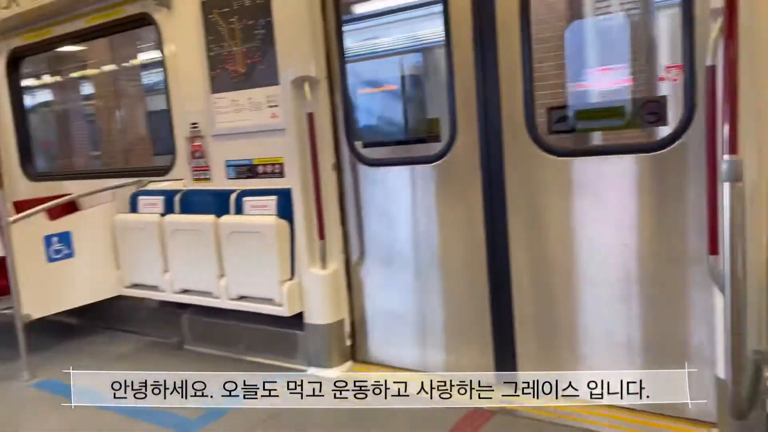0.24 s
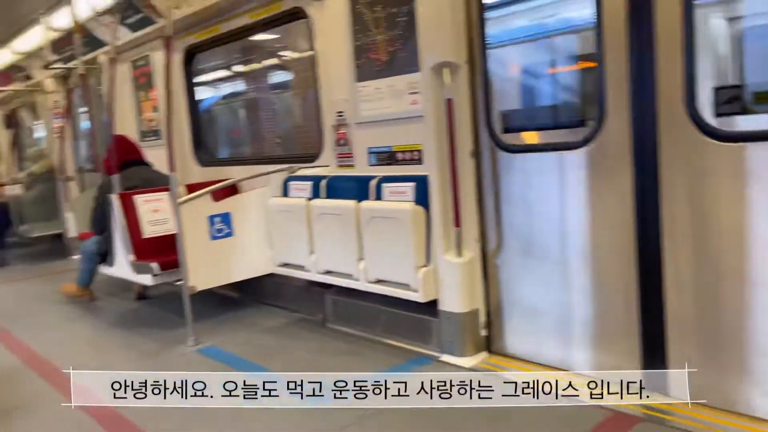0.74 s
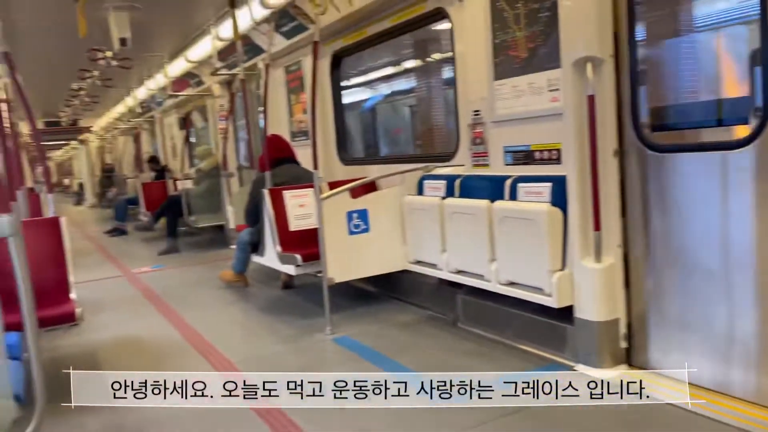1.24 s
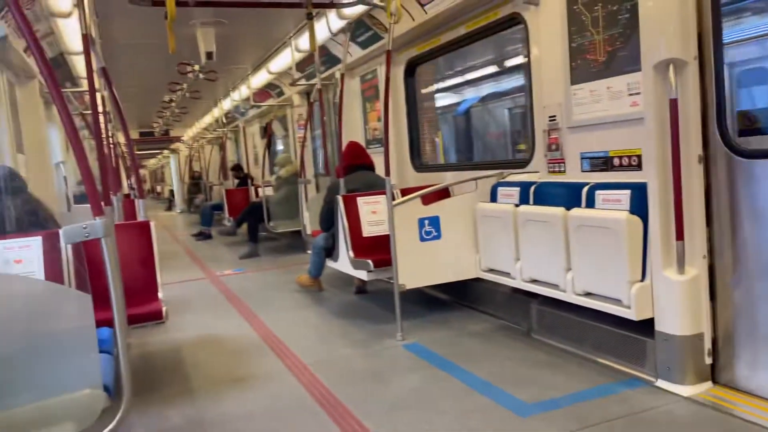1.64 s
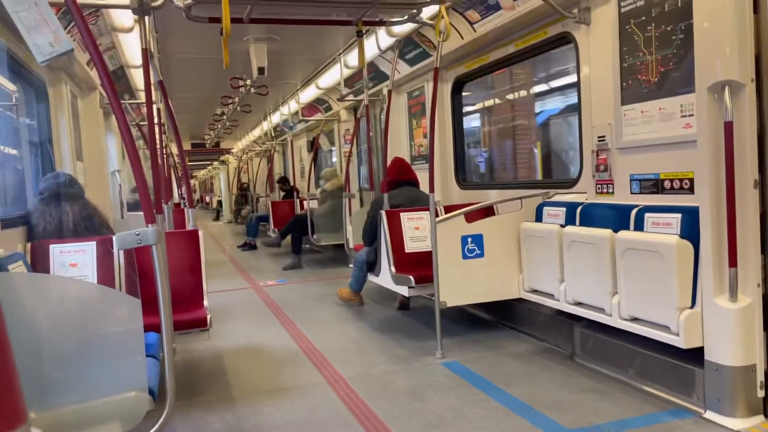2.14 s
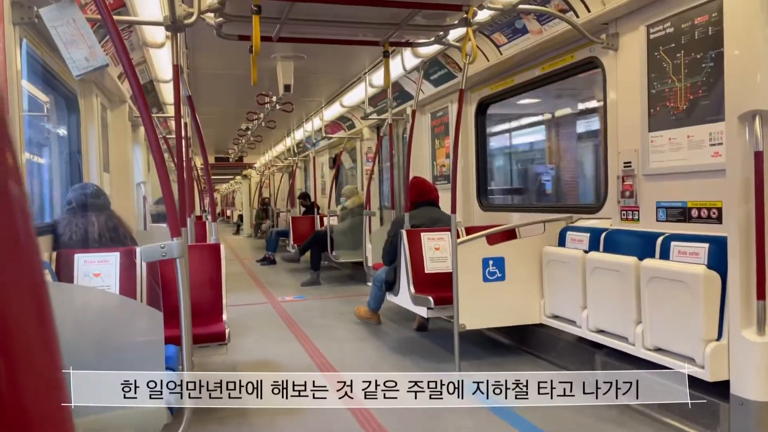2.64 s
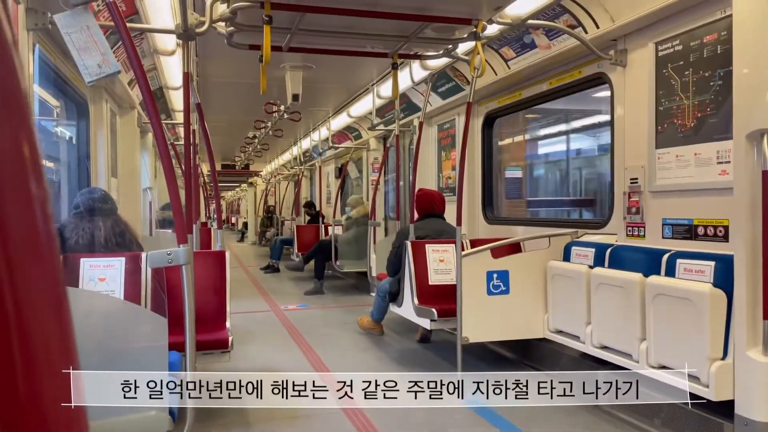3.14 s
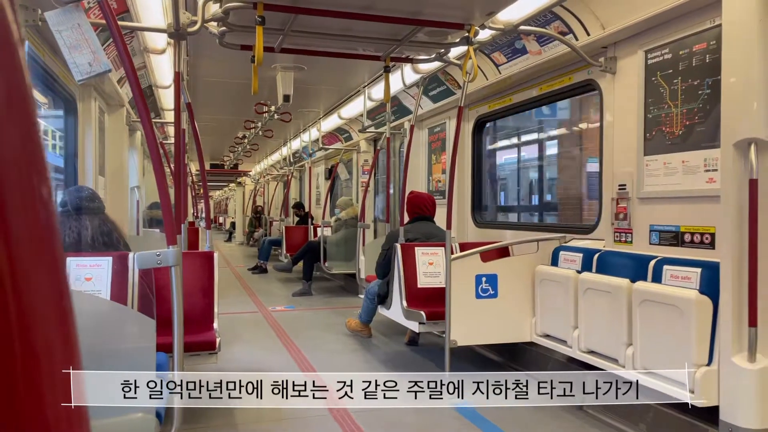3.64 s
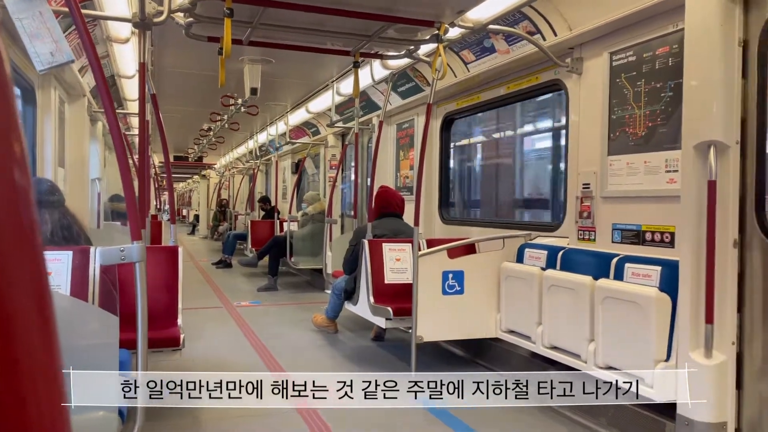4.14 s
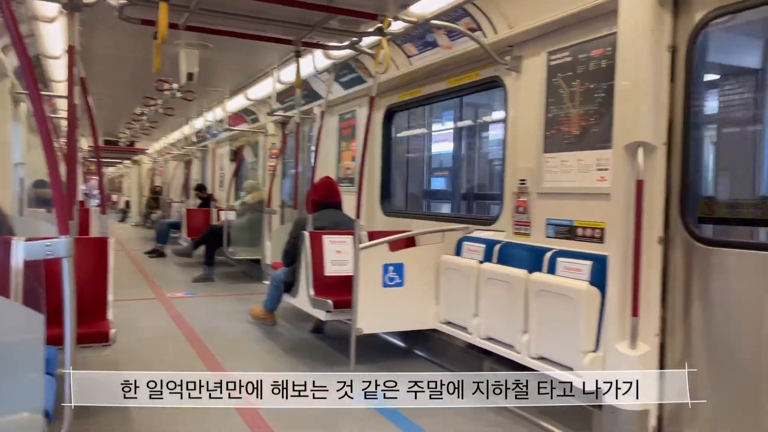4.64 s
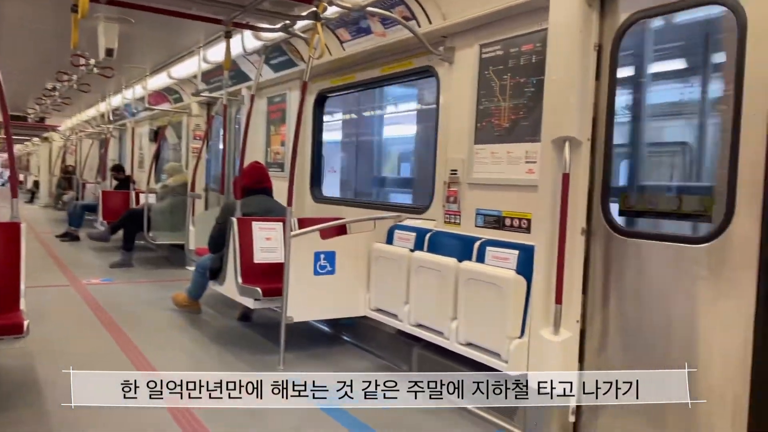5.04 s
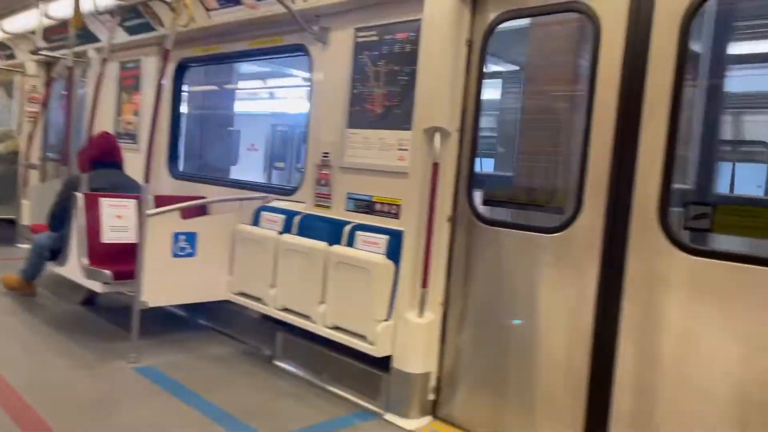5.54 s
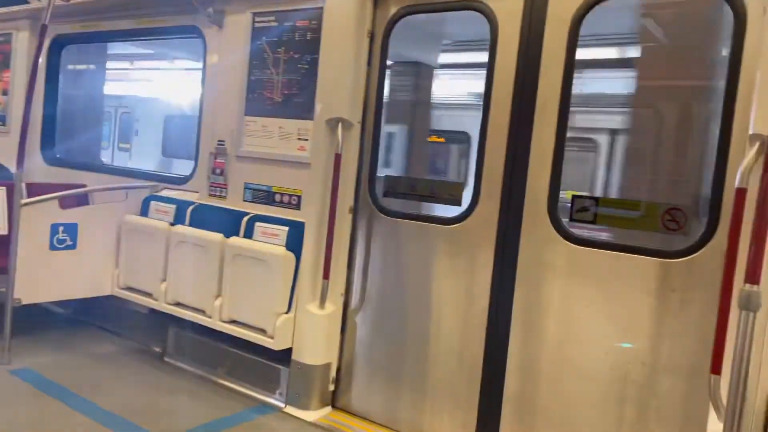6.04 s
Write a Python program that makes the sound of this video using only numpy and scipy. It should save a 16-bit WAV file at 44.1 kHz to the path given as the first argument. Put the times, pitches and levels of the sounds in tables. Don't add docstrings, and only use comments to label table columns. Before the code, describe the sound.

Inside a subway carriage under way, close stereo microphones catch a continuous low wheel rumble and dull floor booms. A thin, beady motor whine grows clearer through the middle, over soft vent hiss and humming rails. Joint thumps become frequent in the second half, jolts get heavier, the whine fades, and a faint brake note enters at the end.

```python
import sys
import numpy as np
from scipy import signal
from scipy.fft import rfft, irfft
from scipy.io import wavfile
from scipy.ndimage import uniform_filter1d

SR = 44100
rng = np.random.default_rng(int(sys.argv[2]) if len(sys.argv) > 2 else 0)


def voltage_ratio(level):
    return 10 ** (np.asarray(level, float) / 20)


def output_pcm(signal):
    pcm = np.clip(np.atleast_2d(signal).T, -1, 1) * 32767
    wavfile.write(sys.argv[1], SR, np.round(pcm).astype(np.int16))


N = 277830


def rms_one(x):
    return x / np.sqrt(np.mean(x ** 2) + 1e-20)


def in_time(rows):
    s, *columns = np.transpose(rows)
    return [np.interp(np.arange(N) / SR, s, column) for column in columns]


def at_hz(points, hz):
    point_hz, value = np.array(points)[:, 0], np.array(points)[:, 1]
    return np.interp(np.log(hz + 1), np.log(point_hz + 1), value)


def drift(rate):
    coarse = 40
    r = np.exp(-2 * np.pi * coarse * rate / SR)
    noise = rng.standard_normal(N // coarse + 2002)
    slow = signal.lfilter([1], [1, -2 * r, r * r], noise)[2000:]
    return np.interp(np.arange(N) / coarse, np.arange(len(slow)), rms_one(slow))


def tone(hz, wobble, rate):
    return np.sqrt(2) * np.sin(2 * np.pi * np.cumsum(hz) / SR + wobble * drift(rate))


RISE_SHARE = .7


def surges(steady_db, s, db, half_s):
    t = np.arange(0, N + 100, 100) / SR
    since = t[:, None] - s
    width_s = half_s * np.where(since < 0, RISE_SHARE, 1)
    bells = voltage_ratio(2 * np.array(db)) * np.exp(-(since / width_s) ** 2)
    surge_power = np.interp(np.arange(N) / SR, t, bells.sum(axis=1))
    return 10 * np.log10(voltage_ratio(2 * steady_db) + surge_power)


# (pitch [Hz], likeness [0-1])
LIKENESS = [(40, 1), (150, 0.75), (300, 0.87), (600, 0.57), (1000, 0.37), (2000, 0.13), (2900, 0.33),
            (4200, 0.54), (5500, 0.26), (6200, 0.54), (7900, 0.74), (10000, 0.52), (11500, 0.46),
            (13300, .45), (14600, 0.79)]
# (pitch [Hz], phase lead [radians])
LEAD = [(20, 0), (600, -.35), (1700, -.35), (2100, -.7), (3100, .7), (4100, -.1), (5100, .9), (5800, -.4),
        (6200, -.4), (6700, -1.1), (7900, -3.1), (8700, -3.2), (10000, -4.9), (11000, -6.3), (12500, -6.4),
        (14000, -9.4)]


def ports(gain_at):
    hz = np.arange(N // 2 + 1) * SR / N
    shared, own = rfft(rng.standard_normal((2, N)))
    alike = np.clip(at_hz(LIKENESS, hz), 0, 1)
    lead = np.interp(hz, *np.transpose(LEAD))
    right = alike * shared * np.exp(-1j * lead) + np.sqrt(1 - alike ** 2) * own
    return rms_one(irfft(np.array([shared, right]) * gain_at(hz), N))


def rolling(spectrum, level_db, flutter_db, flutter_rate):
    level = voltage_ratio(level_db + flutter_db * drift(flutter_rate))
    return level * ports(lambda hz: voltage_ratio(at_hz(spectrum, hz)))


def ringing(centre_hz, width_hz):
    return ports(lambda hz: 1 / (1 + (2 * (hz - centre_hz) / width_hz) ** 2))


# (pitch [Hz], level [dB per Hz])
RUMBLE = [(18, -15), (25, -5), (32, -2.5), (45, 2), (55, -5.5), (70, 8), (95, -6.5), (125, -1),
          (170, -10.5), (300, -110)]


def rumble(panel):
    shaking_db = uniform_filter1d(panel[1], size=8000)
    return rolling(RUMBLE, shaking_db * 0.5 - 17.5, flutter_db=-0.5, flutter_rate=6.1)


# (pitch [Hz], level [dB per Hz])
ROAR = [(40, -77), (80, -3), (120, -1), (170, -3), (300, -5), (420, -9), (520, -23), (800, -30),
        (1500, -110)]
ROAR_DB, ROAR_GROWTH = -31.5, 0.045
JOINT_SURGE_S, JOINT_ROAR_DB = 0.12, -16


def roar():
    joint_s, joint_db = np.transpose(JOINTS)[:2]
    steady_db = ROAR_DB + ROAR_GROWTH * np.arange(N) / SR
    roar_db = surges(steady_db, joint_s, joint_db + JOINT_ROAR_DB, JOINT_SURGE_S)
    return rolling(ROAR, roar_db, flutter_db=0.0, flutter_rate=2.2)


# (pitch [Hz], level [dB per Hz])
RAILS = [(200, -49), (400, -3), (520, -1.5), (750, -1.5), (1000, -8), (1400, -13.5), (2200, -44),
         (4000, -100)]
RAILS_DB, RAILS_FOLLOW = -36.5, 0.99


def rails(drive_db):
    return rolling(RAILS, RAILS_DB + RAILS_FOLLOW * drive_db, flutter_db=.5, flutter_rate=3.5)


# (time [s], level [dB], half length [s])
BRUSHES = [
    (0.552, -54, .08),
    (1.0, -59, .06),
    (2.25, -49, 0.13),
    (2.685, -49, .1),
    (3.56, -48, 0.039),
    (4.144, -60, 0.22),
    (5.344, -47, 0.21),
]
HISS_DB, HISS_FOLLOW = -45, 0.59


def hiss_level(drive_db):
    return surges(HISS_DB + HISS_FOLLOW * drive_db, *np.transpose(BRUSHES))


# (pitch [Hz], level [dB per Hz])
HISS = [(600, -63), (1100, -14), (1500, 2.5), (2000, 2), (2900, -2.5), (3300, -8), (4700, -12), (5300, -16),
        (7000, -20), (8000, -24.5), (10000, -99)]


def hiss(hiss_db):
    return rolling(HISS, hiss_db, flutter_db=.5, flutter_rate=16)


# (pitch [Hz], width [Hz], level [dB])
WHEEL_RINGS = [(1950, 130, -59.5), (2730, 60, -64), (2876, 24, -64.5), (4870, 420, -79)]


def wheel_rings(hiss_db):
    rings = sum(voltage_ratio(db + 1.1 * drift(8.6)) * ringing(hz, width) for hz, width, db in WHEEL_RINGS)
    return rings * voltage_ratio(hiss_db + 45.5)


# (pitch [Hz], level [dB per Hz])
DRAUGHT = [(5000, -59), (6500, -2), (7600, -2), (8700, 5.5), (10000, -2), (10800, -3), (13000, -5.5),
           (15000, -7), (15800, -27)]
# (time [s], level [dB], half length [s])
GUSTS = [(.73, -60.5, .1), (1.08, -62, .03), (1.51, -67, .04), (2.29, -64.5, .06), (2.85, -68, .06),
         (3.2, -65, .04), (3.56, -66, .05), (3.76, -66, .04), (5.0, -59, .025), (5.06, -59.5, .035),
         (5.2, -59.5, .06), (5.32, -60, .11), (.02, -63, .05), (4.25, -66, .15), (4.62, -66, .06),
         (5.56, -63, .08), (.25, -64, .15), (6.0, -70, .4)]
DRAUGHT_DB, DRAUGHT_FOLLOW = -64.5, 1.9


def draught(drive_db):
    draught_db = surges(DRAUGHT_DB + DRAUGHT_FOLLOW * drive_db, *np.transpose(GUSTS))
    return rolling(DRAUGHT, draught_db, flutter_db=.6, flutter_rate=10)


# (time [s], level [dB], half length [s])
WHISTLE = [
    (.72, -69, 0.074),
    (1.72, -69, 0.049),
    (1.921, -70, .05),
    (2.293, -67, 0.085),
    (3.419, -68, 0.066),
    (3.702, -63, 0.11),
    (3.928, -62, 0.045),
    (5.303, -99, 0.091),
]
WHISTLE_DB, WHISTLE_FOLLOW = -75.5, 1.5


def whistle(drive_db):
    whistle_db = surges(WHISTLE_DB + WHISTLE_FOLLOW * drive_db, *np.transpose(WHISTLE))
    return voltage_ratio(whistle_db) * ringing(9400, width_hz=650)


PATCH_DB, PATCH_HZ, PATCH_S = 1.3, 90, .14


def patchy(x):
    padded = np.pad(x, ((0, 0), (0, 2048)), "reflect")
    hz, s, frames = signal.stft(padded, SR, nperseg=1024, boundary="even")
    field = rng.standard_normal(frames.shape[1:])
    field = uniform_filter1d(field, size=round(PATCH_HZ / hz[1]), axis=0)
    field = rms_one(uniform_filter1d(field, size=round(PATCH_S / (s[1] - s[0])), axis=1))
    return signal.istft(frames * voltage_ratio(PATCH_DB * field), SR, nperseg=1024)[1][:, :N]


def shaking(s, hz, db, half_s, steady_db, growth):
    t = np.arange(N) / SR
    return np.interp(t, s, hz), surges(steady_db + growth * t, s, db, half_s)


def shaken(motion, offset_db, wobble, rate):
    hz, level_db = motion
    flutter_db = .6 * drift(27) + .9 * drift(45)
    return voltage_ratio(level_db + offset_db + flutter_db) * tone(hz, wobble, rate)


# (time [s], pitch [Hz], level [dB], half length [s])
BOOM = [(0.07, 92.3, -28.5, 0.038), (0.214, 77.4, -35, 0.052), (0.418, 90, -36, 0.017),
        (0.51, 88.8, -30.5, 0.031), (0.67, 89.7, -33, 0.012), (0.793, 89.7, -32, 0.039),
        (1.07, 85.8, -24, 0.024), (1.272, 92.3, -31, 0.025), (1.439, 89.4, -38, 0.022),
        (1.689, 87.9, -32, .02), (1.84, 76.75, -26, 0.045), (1.963, 85, -24.5, 0.027),
        (2.15, 90.8, -43, 0.033), (2.303, 87.3, -23.5, 0.016), (2.479, 92, -25, 0.028),
        (2.609, 93.8, -19.5, 0.048), (2.808, 98.44, -27, 0.12), (2.958, 97.8, -26.5, 0.063),
        (3.137, 98.05, -21.5, 0.048), (3.308, 95.4, -27, 0.033), (3.399, 95.8, -25.5, 0.025),
        (3.502, 94.65, -29, .03), (3.673, 91.8, -19, 0.043), (3.819, 94.3, -24, 0.06),
        (4.08, 93.7, -20.5, 0.028), (4.17, 92.1, -26.5, 0.037), (4.4, 92.2, -32, 0.019),
        (4.505, 87, -18.5, 0.033), (4.631, 85.7, -24, 0.037), (4.812, 92.6, -23.5, 0.032),
        (4.917, 94.8, -17.5, 0.022), (5.087, 97.9, -26, 0.037), (5.267, 98.9, -14, 0.024),
        (5.38, 92.4, -23.5, .022), (5.47, 101.1, -23.5, 0.022), (5.528, 97, -24, 0.016),
        (5.597, 88.1, -18, 0.025), (5.677, 95, -18.5, 0.031), (5.767, 93.8, -25, 0.017),
        (5.835, 95.1, -23.5, 0.028), (5.93, 95.4, -20.5, 0.018), (6, 95.16, -23, .025),
        (6.074, 93.2, -20, 0.023), (6.176, 98.2, -20.5, .02), (6.246, 93.5, -16, 0.022)]
BOOM_DB, BOOM_GROWTH = -41, 1.0


def floor_shaking():
    return shaking(*np.transpose(BOOM), BOOM_DB, BOOM_GROWTH)


# (time [s], pitch [Hz], level [dB])
SWAY = [(0.39, 56.8, -32), (0.89, 55.9, -35), (1.15, 61.3, -39), (1.31, 54.5, -30), (1.63, 63.1, -30),
        (1.93, 57.7, -25.5), (2.14, 53.9, -26), (2.621, 55.5, -31), (2.88, 63.76, -42), (3.2, 56.3, -24),
        (3.4, 56.17, -20), (3.67, 58, -28), (3.94, 55.15, -42), (4.18, 59.4, -25.5), (4.51, 59.4, -31),
        (4.74, 56.4, -26.5), (4.9, 53.45, -24), (5.29, 51.75, -27), (5.43, 62.6, -27), (5.6, 57, -38),
        (5.94, 55.1, -33), (6.26, 53.9, -23)]
SWAY_DB, SWAY_GROWTH, SWAY_SURGE_S = -42, 1, 0.073


def boom(panel):
    sway = shaking(*np.transpose(SWAY), SWAY_SURGE_S, SWAY_DB, SWAY_GROWTH)
    body = shaken(panel, offset_db=-1.0, wobble=0.91, rate=6.0)
    body = body + shaken(sway, offset_db=-2.5, wobble=0.9, rate=12.0)
    return body * voltage_ratio([[1.1], [-.9]])


# (time [s], level [dB], half length [s])
BEADS = [(0.246, -49, 0.045), (0.355, -49.5, 0.027), (.46, -57, .015), (0.532, -62, 0.014),
         (.66, -53, 0.014), (0.768, -63, 0.02), (0.848, -66, 0.032), (0.958, -56, 0.019),
         (1.026, -48, .025), (1.074, -47, 0.014), (1.128, -43, 0.012), (1.205, -48, 0.016),
         (1.273, -55, .015), (1.318, -47, 0.015), (1.395, -42, 0.025), (1.48, -50, .015), (1.53, -49, .015),
         (1.605, -43, 0.016), (1.674, -44, 0.012), (1.703, -45, .012), (1.822, -48, 0.016),
         (1.895, -46.5, 0.032), (1.957, -51, 0.019), (2.056, -42.5, 0.02), (2.14, -40, 0.017),
         (2.268, -45, 0.042), (2.37, -64, 0.023), (2.455, -48, 0.014), (2.675, -55, 0.017),
         (2.737, -47, 0.016), (2.799, -44, 0.038), (2.869, -44, 0.037), (3.005, -49, 0.019),
         (3.06, -44, 0.017), (3.143, -48, 0.028), (3.21, -44, 0.022), (3.294, -48, 0.019),
         (3.328, -50, 0.013), (3.39, -43, 0.016), (3.446, -43.5, 0.016), (3.495, -44, 0.04),
         (3.584, -51, 0.021), (3.626, -44, 0.018), (3.672, -46, 0.018), (3.733, -44.5, 0.027),
         (3.79, -45, .012), (3.845, -45, 0.037), (4.014, -52, 0.021), (4.066, -53, 0.016),
         (4.115, -45, 0.024), (4.231, -46, 0.02), (4.359, -45.5, 0.03), (4.44, -52, .015),
         (4.484, -51, 0.02), (4.575, -51, 0.026), (4.822, -51, 0.04), (5.0, -51.5, 0.041),
         (5.188, -51, 0.025), (5.419, -49, 0.023), (5.474, -58, 0.018)]
WHINE_HZ = 1941
WHINE_DB, WHINE_FOLLOW = -55.5, 2.3


def whine(drive_db):
    level_db = surges(WHINE_DB + WHINE_FOLLOW * drive_db, *np.transpose(BEADS))
    pan_db = 0.65 + 2.5 * drift(4)
    flutter_db = 1.4 * drift(40)
    jitter = .2 * drift(45)
    phase = 2 * np.pi * WHINE_HZ * np.arange(N) / SR + 0.5 * drift(9.5) + jitter
    apart = 0.49 + 0.12 * drift(7)
    sides = np.sin([phase + apart, phase - apart]) + voltage_ratio(-21.0) * np.sin(2 * phase)
    return sides * voltage_ratio(level_db + 2.5 + flutter_db + np.outer([.5, -.5], pan_db))


# (time [s], peak level [dB], low, middle and high note's share [dB])
JOINTS = [(1.949, -23.5, -5, -14, -9), (2.578, -17.5, -25, -6, -12), (3.178, -28, 0, -10, -17),
          (4.478, -16, -3, -7, -7.5), (4.54, -24.5, -17, -11, 0.5), (4.872, -15.5, -9, -7, -8),
          (5.249, -18.5, -5, -21, -14), (5.36, -21.5, -2, -8, -14), (5.49, -30, -2, -10, -15),
          (5.609, -23.5, 6, -34, -4.5), (5.699, -30, 7.5, -11, -19), (5.919, -15.5, -5, -13, -13),
          (0.03, -29, 3.5, -10, -13), (0.55, -29.5, -8, -2.5, -9), (2.25, -27, -16, -3, -8),
          (6.04, -25, -1, -18, -21), (6.17, -21.5, -0.5, -14, -7), (6.25, -27, -5, -16, -8)]
# (pitch [Hz], width [Hz])
JOINT_MODES = [(160, 59), (285, 32), (370, 46)]


def joints():
    out, swell = 0, np.hanning(round(.13 * SR))
    for k, (hz, width) in enumerate(JOINT_MODES):
        knocks = np.zeros(N)
        knocks[[round(row[0] * SR) for row in JOINTS]] = [voltage_ratio(row[1] + row[2 + k] - 7.5) for row in JOINTS]
        shake = signal.fftconvolve(knocks, swell)[len(swell) // 3:][:N]
        out = out + shake * tone(np.full(N, hz), wobble=1.8, rate=width / 4)
    return out * voltage_ratio([[.9], [-.6]])


# (time [s], pitch [Hz], level [dB])
CATCHES = [(0.58, 150, -39), (3.27, 278.5, -40), (0.3, 2070, -55), (0.37, 418.6, -42.5), (0.43, 3200, -67),
           (0.549, 1320, -50), (0.64, 2401, -64), (0.65, 2918, -61), (0.99, 2527, -60), (1.0, 2840, -60),
           (1.3, 614, -43), (1.31, 2850, -58), (1.53, 3140, -61), (1.71, 1554, -51), (1.74, 2800, -55),
           (1.76, 1393, -53), (2.08, 2630, -54), (2.13, 1368, -51), (2.2, 3140, -63), (2.26, 416.5, -38.5),
           (2.35, 1520, -57), (2.63, 2412, -56), (2.64, 3000, -57), (2.69, 743, -41), (2.69, 2185, -54),
           (2.69, 2260, -55), (2.76, 3060, -57), (2.83, 2186, -52), (3.04, 2740, -56), (3.15, 2524, -55),
           (3.28, 2950, -58), (3.37, 2460, -57), (3.37, 2740, -56), (3.51, 3055, -60), (3.53, 2638, -58),
           (3.61, 2513, -59), (3.65, 870, -46), (3.77, 2880, -59), (4.11, 2848, -58), (4.13, 2178, -49),
           (4.24, 2320, -51), (4.56, 2869, -62), (4.77, 2880, -59), (4.83, 2953, -61), (4.88, 2712, -58),
           (5.18, 1561, -54), (5.3, 2860, -68), (5.31, 2210, -64), (4.9, 205, -34.5), (5.4, 2707, -56),
           (5.42, 1660, -53), (5.57, 2875, -58), (5.62, 896, -53), (5.63, 805.5, -47), (5.72, 922.6, -48),
           (5.82, 2705, -69), (5.86, 3264, -67), (5.95, 2862, -62), (5.999, 2760, -56), (6.19, 614, -41)]
CATCH_S, CATCH_GAIN_DB = .17, 3.0


def catches():
    out, s = np.zeros((2, N + SR)), np.arange(round(CATCH_S * SR)) / SR
    swell = np.sin(np.pi * s / CATCH_S)
    slip, chance = drift(18), rng.normal(0, 1, (len(CATCHES), 2))
    for (centre, hz, level_db), (pan, apart) in zip(CATCHES, chance):
        on = max(round((centre - CATCH_S / 2) * SR), 0) + np.arange(len(s))
        phase = 2 * np.pi * hz * s + slip[np.minimum(on, N - 1)]
        sides = np.sin([phase + .4 * apart, phase - .4 * apart]) * voltage_ratio([[1.5 * pan], [-1.5 * pan]])
        out[:, on] += voltage_ratio(level_db + CATCH_GAIN_DB) * swell * sides
    return out[:, :N]


# (time [s], length [s], first
# pitch [Hz], last pitch [Hz], level [dB])
SQUEALS = [(2.89, .2, 2775, 2750, -57), (3.1, .38, 2770, 2720, -61), (.3, .9, 3900, 3880, -66),
           (3.47, .19, 2680, 2490, -55.5), (3.17, .1, 790, 690, -45), (3.58, .08, 2500, 2470, -56),
           (3.4, .1, 480, 480, -45), (4.05, .12, 2060, 2150, -57), (4.2, .13, 2350, 2450, -56),
           (5.35, .15, 2050, 2000, -56), (2.58, .3, 4600, 4550, -60), (3.55, .3, 4650, 4650, -62),
           (5.92, .42, 1440, 1495, -57), (5.995, .035, 1445, 1450, -48), (6.1, .075, 1428, 1455, -49),
           (5.94, .045, 1445, 1450, -53), (6.165, .085, 1480, 1500, -49), (6.245, .06, 1510, 1450, -45),
           (6.24, .1, 1720, 1745, -51)]
# (pitch [Hz], phase scatter [radians])
SLIP_RADIANS = [(1450, .9), (2250, 1.5), (2680, 1.2), (2800, .8), (3900, 3), (4650, 8)]


def squeals():
    out, s = np.zeros((2, N)), np.arange(N) / SR
    slips = np.array([drift(22) for side in range(2)])
    for start, length, first_hz, last_hz, level_db in SQUEALS:
        on = (s > start) & (s < start + length)
        along = (s[on] - start) / length
        phase = 2 * np.pi * np.cumsum(first_hz + (last_hz - first_hz) * along) / SR
        swell = voltage_ratio(level_db + 7.0) * np.sin(np.pi * along) ** 1.2
        out[:, on] += swell * np.sin(phase + at_hz(SLIP_RADIANS, first_hz) * slips[:, on])
    return out


# (time [s], level [dB])
DRIVE = [(0, -2), (.3, -2), (.65, 0.5), (1.8, 0), (2.1, 1.5), (2.5, 1), (2.75, 1), (3.7, 0.5), (4.1, 0),
         (4.4, -1.5), (4.8, -2), (5.3, -2), (5.9, -2), (6.3, -1.5)]


def scene():
    drive_db, = in_time(DRIVE)
    panel = floor_shaking()
    hiss_db = hiss_level(drive_db)
    noise = rumble(panel) + roar() + rails(drive_db) + hiss(hiss_db) + draught(drive_db)
    carriage = patchy(noise) + wheel_rings(hiss_db) + whistle(drive_db)
    carriage = carriage * voltage_ratio([[.4], [-.4]])
    return carriage + boom(panel) + whine(drive_db) + joints() + catches() + squeals()


def leave_out(x, gaps):
    padded = np.pad(x, (0, 4096), "reflect")
    hz, s, frames = signal.stft(padded, SR, nperseg=2048, boundary="even")
    for low, high, wander in gaps:
        edges = np.array([[low], [high]]) + wander * rng.standard_normal((2, len(s)))
        frames = frames * ((hz[:, None] < edges[0]) | (hz[:, None] > edges[1]))
    return signal.istft(frames, SR, nperseg=2048)[1][:N]


def band_limit(x):
    return signal.sosfilt(signal.butter(12, 15720, fs=SR, output="sos"), x)


# (low edge [Hz], high edge [Hz], edge wander [Hz])
SUM_GAPS = [(7650, 8850, 60), (13800, 21000, 60)]
# (low edge [Hz], high edge [Hz], edge wander [Hz])
DIFFERENCE_GAPS = [(10400, 12950, 250), (15500, 21000, 450)]


def record(dry):
    total = leave_out((dry[0] + dry[1]) / 2, SUM_GAPS)
    difference = leave_out((dry[0] - dry[1]) / 2, DIFFERENCE_GAPS)
    mix = np.array([total + difference, total - difference])
    return band_limit(mix)


dry = scene()
out = record(dry)
output_pcm(out)
```